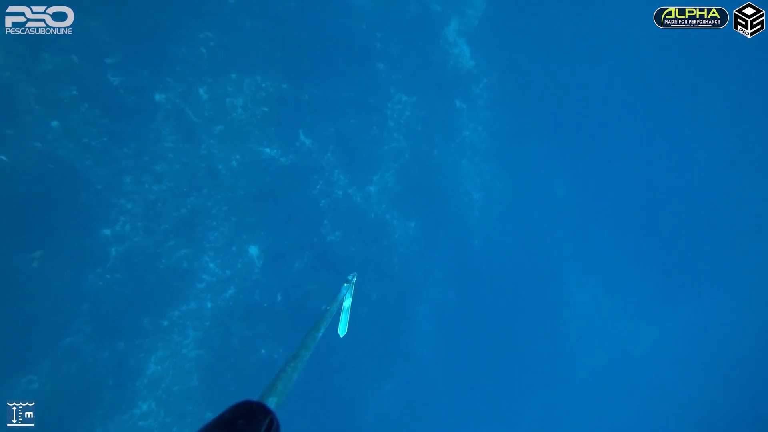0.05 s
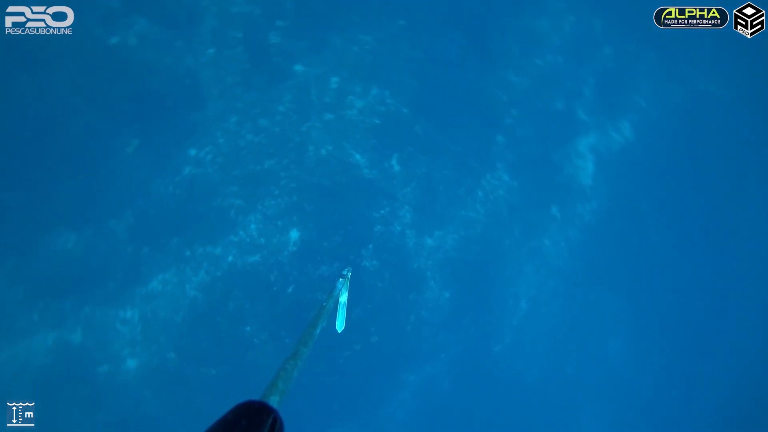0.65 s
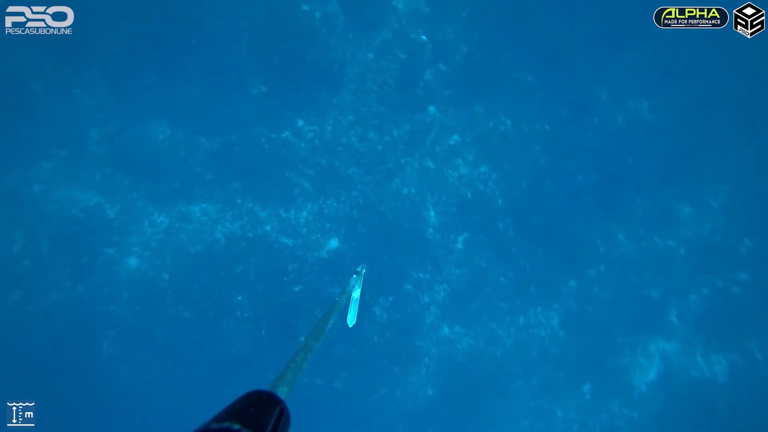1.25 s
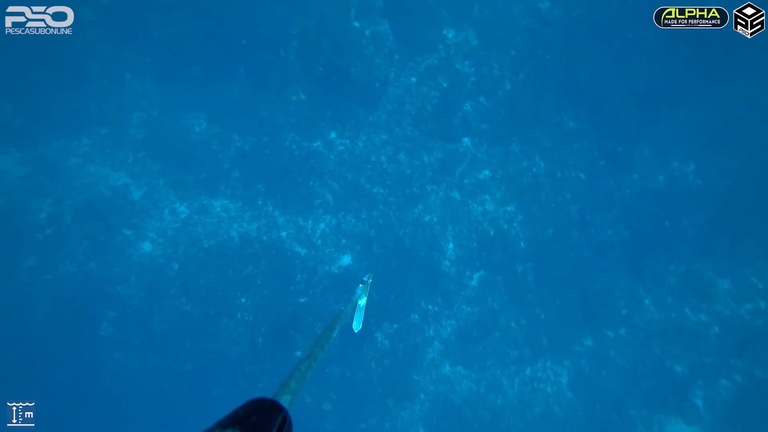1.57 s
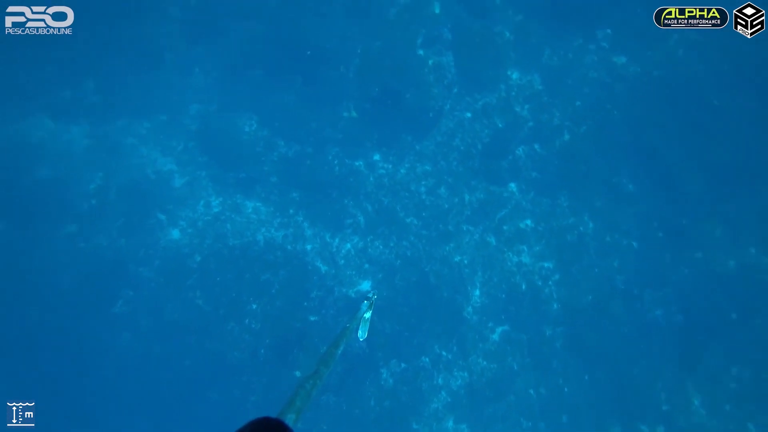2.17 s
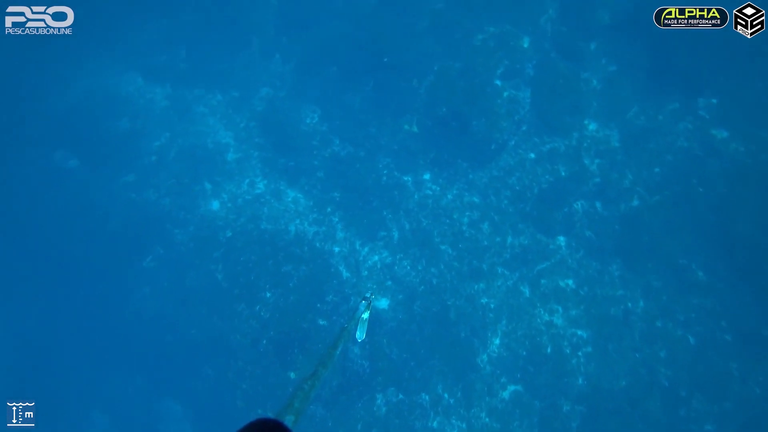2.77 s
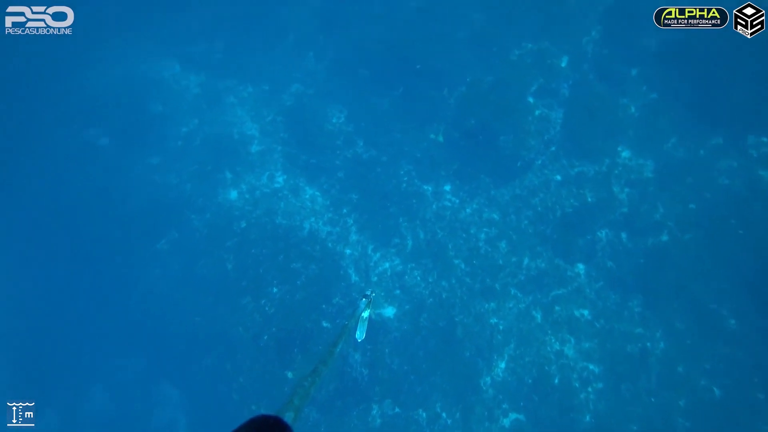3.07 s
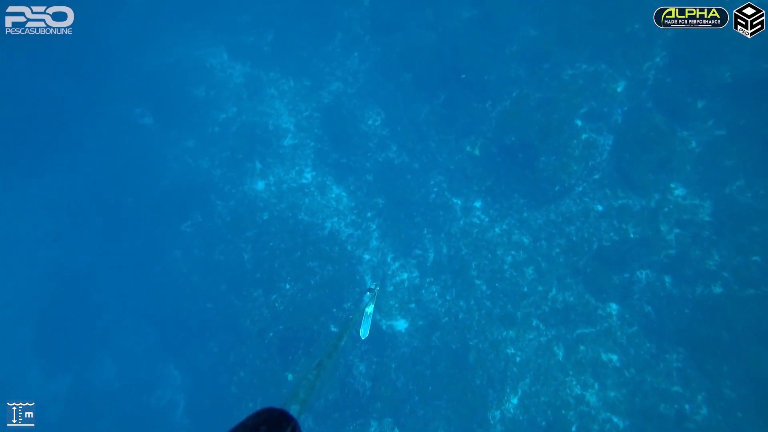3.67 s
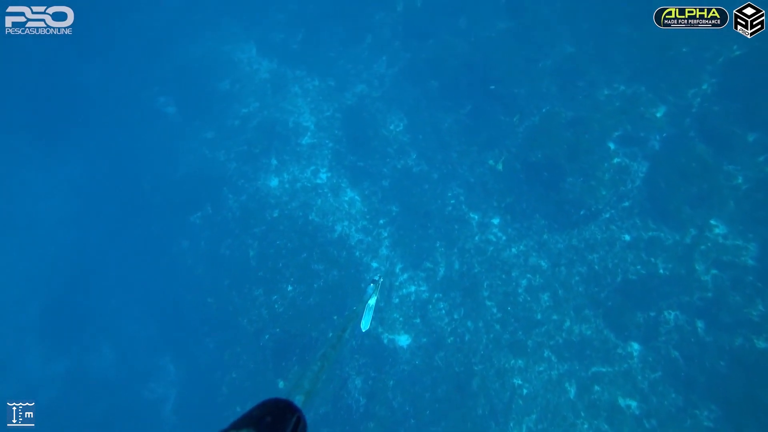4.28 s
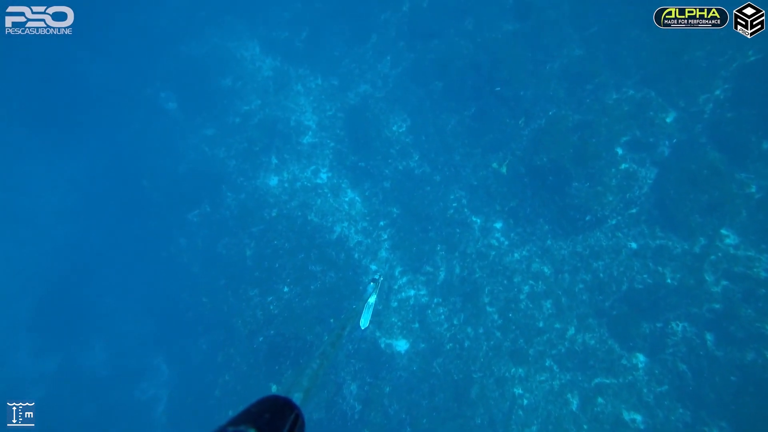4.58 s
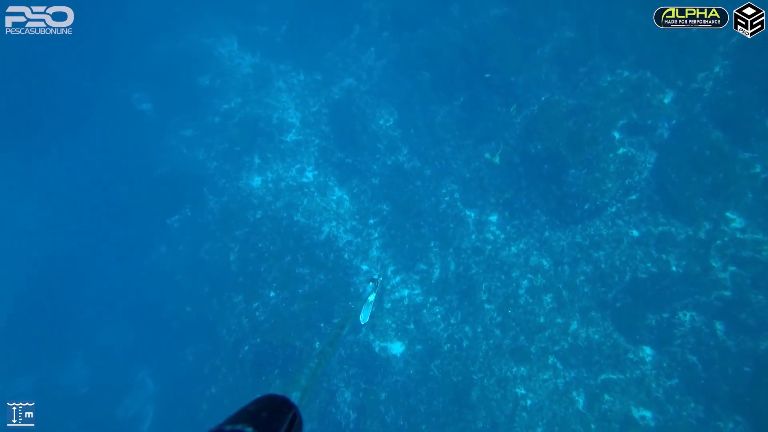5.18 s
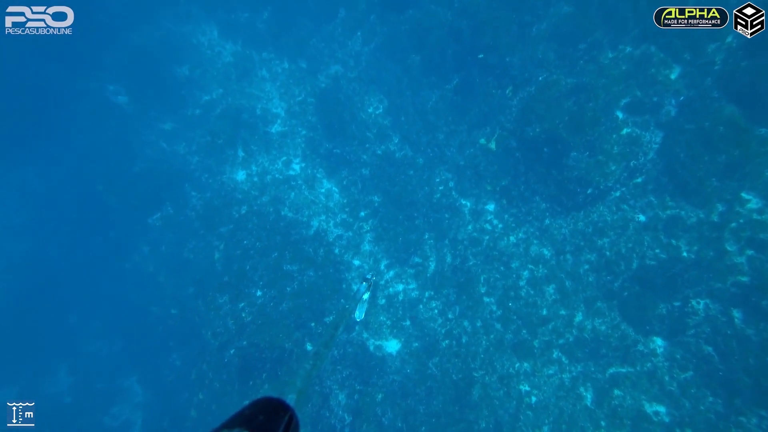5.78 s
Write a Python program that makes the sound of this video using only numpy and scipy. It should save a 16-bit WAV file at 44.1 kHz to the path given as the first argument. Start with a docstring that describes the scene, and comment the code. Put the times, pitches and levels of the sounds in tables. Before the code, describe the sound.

A steady, hollow underwater hiss runs for all six seconds, heard through a waterproof camera housing. Distant snapping shrimp add a fine, dense crackle, while close ones make sharp, bright, irregular clicks with short, grainy echoes. The strongest come at about 2.3, 4.0, 4.8 and 5.1 seconds, with a thinner stretch around three.

Underneath, passing water makes a dark rumble and deep surges, strongest between 0.9 and 1.5 seconds. The diver's gear hums on one low, fluttering note that swells from about 1 to 2.2 seconds, again near 3.9, and from 4.5 to 5.

At about 1.3 seconds the gear gives five quick, soft, hollow knocks. Small bubbles blip near 0.7, 3.9 and 5.3 seconds. Dull, briefly rattling clacks are scattered throughout, clearest near 1.7 and 3.9 seconds and between 4.8 and 5.5.

```python
"""A bright crackle of snapping shrimp over a low, swelling hum and rumble: a diver gliding over a reef.
Each snap is a collapsing cavity that rings the waterproof camera housing and scatters off the rocks.
Passing water rumbles and sets the diver's gear humming, over a steady, hollow wash.
Small bubbles blip, dull clacks rattle, and the gear gives one quick run of knocks."""
import sys
import numpy as np
from scipy import signal
from scipy.fft import rfft, irfft
from scipy.io import wavfile

SR = 44100
rng = np.random.default_rng(int(sys.argv[2]) if len(sys.argv) > 2 else 0)


def pcm_store(signal):
    """Save signal as 16-bit PCM."""
    levels = np.round(np.clip(np.atleast_2d(signal), -1, 1) * 32767)
    wavfile.write(sys.argv[1], SR, levels.astype(np.int16).T)


N = 266364
TIME = np.arange(N) / SR
FREQS = np.fft.rfftfreq(N, 1 / SR)
LEFT_RIGHT = np.array([[1], [-1]])  # opposite signs at the housing's two sound ports

# Table levels are relative: each source adds its own gain.
# Tone of the wash, shared by the ports (mid) and opposed (side). Each row: frequency in Hz, level in dB.
WASH_MID = [(100, 12.5), (300, 3.5), (450, 1), (700, 4.5), (950, 0.5), (1200, 3.5), (1550, -3), (2100, 2),
            (2450, -1), (2800, -5.5), (4200, -10), (6000, -11.5), (11000, -15.5)]
WASH_SIDE = [(60, -2), (200, -2.5), (270, 0.5), (350, -6), (650, -2.5), (900, -4.5), (1200, 1), (1600, -7),
             (2080, -3), (2450, -10), (3000, -14.5), (4200, -19.5), (6000, -25), (11000, -30.5)]
# Resonances the wash keeps ringing. Each row: pitch in Hz, width in Hz, mid in dB, side in dB.
WASH_RINGS = [(2022, 170, -73.5, -66), (2517, 41, -76, -75), (10900, 23, -98, -100)]
# The wash eases as the diver sinks away from the surface. Each row: time in seconds, level in dB.
WASH_LEVEL = [(0.0, 0), (1.3, 1), (3.0, -0.68), (6.04, -0.63)]
# Swells of the surge, the turbulence and the flow-driven hum. Each row: time in seconds, level in dB.
SURGE_LEVEL = [(0.0, -54), (0.57, -62), (0.86, -58), (0.93, -41), (0.99, -71), (1.14, -49.5), (1.46, -45.5),
               (2.56, -56.5), (2.73, -52), (2.84, -57), (2.94, -58), (6.04, -50.5)]
RUMBLE_LEVEL = [(0.0, -69), (0.55, -56.5), (1.0, -56.5), (1.3, -48.5), (1.55, -55), (2.5, -55.5),
                (2.95, -65), (3.25, -55), (3.9, -54.5), (5.4, -57.5), (6.04, -54.5)]
HUM_LEVEL = [(0.0, -56), (0.1, -67), (0.35, -55), (0.99, -59), (1.07, -46), (1.3, -44.5), (1.68, -47.5),
             (1.8, -41.5), (2.2, -45.5), (2.32, -71), (2.44, -51.5), (2.78, -58.5), (2.93, -47.5),
             (3.41, -57.5), (3.92, -41), (4.2, -51), (4.45, -50.5), (4.56, -42), (5.03, -45.5), (5.1, -53),
             (5.82, -49.5), (6.04, -65.5)]
# Tone of the surge, the rumble and the clacks. Each row: frequency in Hz, level in dB.
SURGE_COLOUR = [(12, -6), (22, -4.5), (29, -4.5), (38, -2), (50, -12.5), (80, -33), (200, -91), (600, -65)]
RUMBLE_COLOUR = [(45, -2.5), (90, -5.5), (130, -12.5), (155, -9.5), (200, -22.5), (300, -30), (600, -49.5)]
CLACK_COLOUR = [(300, -37), (900, -9), (1350, -14.5), (1600, -14.5), (1830, 4), (2150, -6.5), (2450, 0),
                (2750, -17.5), (3100, -5), (3800, -10), (4450, -15), (4780, -12.5), (5800, -7.5),
                (7200, -17.5), (11000, -37)]
# Cues for the bubble blips, gear knocks and clacks. Each row: start in seconds, level in dB.
BLIPS = [(0.013, -50), (0.025, -51), (0.729, -40.5), (1.818, -56), (1.873, -56), (2.992, -58), (3.379, -56),
         (3.443, -56), (3.883, -48), (3.891, -40.5), (3.907, -41.5), (4.007, -51), (4.177, -55.5),
         (4.236, -51), (4.273, -56.5), (4.498, -54), (5.021, -49), (5.038, -49), (5.308, -49.5),
         (5.344, -49.5), (5.366, -45.5), (5.606, -53)]
KNOCKS = [(1.281, -37.5), (1.313, -42.5), (1.341, -44), (1.36, -41), (1.396, -38)]
CLACKS = [(0.0623, -52), (0.2134, -45.5), (0.841, -51.5), (1.2525, -44), (1.471, -47.5), (1.7278, -39),
          (1.8561, -43.5), (2.391, -50), (3.1615, -50), (3.5274, -52), (3.9494, -41.5), (4.0593, -50),
          (4.793, -40.5), (4.8753, -45.5), (4.9505, -40), (5.1767, -48), (5.2846, -47.5), (5.369, -42.5),
          (5.4626, -47.5), (5.8915, -45.5)]
# Modes of the knocked gear and of the housing that the snaps ring.
# Each row: pitch in Hz, time to fall 60 dB in seconds, level in dB, phase between the ports in radians.
GEAR_MODES = [(157.7, 0.28, -7.5, 1.7), (175, 0.21, -18, 1.8), (264, 0.24, -6, 2.56),
              (330, 0.0087, 4, 1.64), (560, 0.1, -11, 1.8), (615, 0.041, 0.5, 2.1), (1120, 0.022, -16, 2)]
HOUSING_MODES = [(2200, 0.0093, -17, 1), (3170, 0.0055, -11.5, 1.3), (4460, 0.0039, -17, 3.5),
                 (4890, 0.0037, -7.5, 0), (5450, 0.008, -8, 2.86), (6040, 0.0038, 2, 1.5),
                 (6910, 0.0043, -7.5, 1.13), (8050, 0.0026, -3, 0.86), (8640, 0.0038, -11, 0),
                 (9940, 0.0063, -18.5, -3)]
# How busy the distant colony sounds. Each row: time in seconds, level in dB.
COLONY_LEVEL = [(0.0, -65), (0.23, -59), (0.45, -65), (0.75, -65), (2.05, -63.5), (2.42, -63),
                (2.85, -63.5), (3.4, -62), (4.35, -64), (4.9, -63), (6.04, -64)]
# Close shrimp snaps.
# Each row: start in seconds, level in dB, favoured pitch in Hz, echo tail in dB against the snap.
SNAPS = [(0.0634, -37, 7130, -6), (0.0729, -35, 5880, -11), (0.1326, -39.5, 6050, -12),
         (0.1508, -44, 5880, -8), (0.2514, -36.5, 6060, -4), (0.2675, -32.5, 6200, -8),
         (0.328, -33.5, 6230, -16), (0.5791, -41, 8020, -8), (0.618, -30.5, 5900, -9),
         (0.841, -35.5, 6130, -12), (0.8484, -42, 4170, -6), (0.8672, -38.5, 6060, -4),
         (0.8963, -41, 5940, -4), (1.0939, -35, 5980, -10), (1.2115, -37, 6300, -8),
         (1.293, -37, 6200, -10), (1.3332, -35.5, 6230, 0), (1.4326, -39.5, 6090, -11),
         (1.6426, -32, 6000, -9), (1.6845, -36, 5600, -1), (1.7798, -33.5, 6030, -14),
         (1.8552, -40.5, 6000, -11), (2.0335, -37, 6030, -9), (2.0655, -36.5, 6250, -7),
         (2.3026, -39, 8930, -8), (2.3353, -26.5, 6260, -1), (2.3444, -46, 8150, -12),
         (2.4084, -39, 5800, -8), (2.4643, -42, 5290, -5), (2.9492, -45, 6050, -5), (3.1602, -44, 6060, -3),
         (3.3732, -38.5, 5860, -4), (3.4479, -42.5, 8200, -5), (3.5258, -39, 6300, -10),
         (3.7534, -40.5, 9790, -17), (3.9005, -41, 5440, -8), (4.0464, -23.5, 5900, -11),
         (4.1067, -28.5, 5700, -12.5), (4.118, -33.5, 6030, -5), (4.7686, -43, 5410, -5),
         (4.8207, -29, 6130, -7), (4.8279, -33.5, 5600, -9), (4.8735, -39, 6100, -10),
         (5.0741, -28.5, 6040, -8), (5.178, -32, 6320, -8), (5.372, -35, 6240, -4), (5.3844, -37, 5470, -3),
         (5.4345, -40, 4730, -8), (5.455, -36, 5800, -8), (5.651, -36, 9500, -15),
         (5.6625, -30, 5950, -10.5)]


def undb(db):
    """Decibels to gain."""
    return 10 ** (np.asarray(db) / 20)


def unit(x):
    """Scale to rms 1."""
    return x / np.sqrt(np.mean(x ** 2))


def curve(table):
    """A fader ride: straight lines through (seconds, value) points."""
    return np.interp(TIME, *np.transpose(table))


def noise(gain):
    """Noise of rms 1, shaped by a gain at each frequency."""
    return unit(irfft(rfft(rng.standard_normal(N)) * gain, N))


def colour(points):
    """An EQ curve through (Hz, dB) points, rolling off below the first."""
    hz, db = np.transpose(points)
    return undb(np.interp(np.log(FREQS + 1), np.log(hz), db)) * np.minimum(FREQS / hz[0], 1) ** 2


def wander(rate_hz):
    """Smooth random modulation of rms 1, moving at up to about rate_hz."""
    return noise(1 / (1 + (FREQS / rate_hz) ** 4))


def add(out, start, sound):
    """Mix a sound in at a time in seconds."""
    i = int(np.clip(start * SR, 0, N - 1))
    out[:, i:i + sound.shape[1]] += sound[:, :N - i]


def ring(modes, length_s, scatter_db, rise_s):
    """A struck body: each blow shares its energy differently among modes, heard out of step per port."""
    t = np.arange(int(length_s * SR)) / SR
    out = 0
    for hz, t60, db, lag in modes:
        detuned_hz = hz * (1 + 0.025 * rng.standard_normal())
        phase = 2 * np.pi * (detuned_hz * t + rng.random())
        envelope = undb(db + scatter_db * rng.standard_normal()) * np.exp(-np.log(1000) * t / t60)
        out = out + envelope * np.sin(phase + LEFT_RIGHT * lag / 2)
    return out * (1 - np.exp(-t / rise_s))


def reef_echoes(sound, early_t60=0.058, late_t60=1.0, late_db=-15):
    """Rocks and the surface return a snap as a grainy tail: a quick cluster, then faint stragglers."""
    t = np.arange(SR // 6) / SR
    fade = np.exp(-np.log(1000) * t / early_t60) + undb(late_db) * np.exp(-np.log(1000) * t / late_t60)
    echoes = rng.standard_normal(len(t)) * (rng.random(len(t)) < .06) * fade
    return signal.fftconvolve(sound, echoes[None] / np.linalg.norm(echoes), axes=1)


def wash(mid_db=-62.0, side_db=-56.5, sway_db=1.0):
    """The bed: a wide, steady hiss coloured by the hollow housing, largely opposite at the two ports."""
    mid = noise(colour(WASH_MID)) * undb(mid_db)
    side = noise(colour(WASH_SIDE)) * undb(side_db)
    for hz, width, ring_mid_db, ring_side_db in WASH_RINGS:
        peak = 1 / (1 + (2 * (FREQS - hz) / width) ** 2)
        mid = mid + noise(peak) * undb(ring_mid_db)
        side = side + noise(peak) * undb(ring_side_db)
    return (mid + LEFT_RIGHT * side) * undb(curve(WASH_LEVEL) + sway_db * wander(3.8))


def surge(gain_db=-1, side_db=-12):
    """Water pushes slowly against the housing in sub-bass swells."""
    tone = colour(SURGE_COLOUR)
    pressure = noise(tone) + LEFT_RIGHT * undb(side_db) * noise(tone)
    return pressure * undb(curve(SURGE_LEVEL) + gain_db)


def rumble():
    """Turbulence round the housing makes a dark rumble, dead centre."""
    return noise(colour(RUMBLE_COLOUR)) * undb(curve(RUMBLE_LEVEL))


def gear_hum(gain_db=3.5, pitch_hz=66.53, drift_hz=0.41, flutter=0.067, buffet=0.18, buffet_hz=8):
    """Shed vortices keep the gear humming on one low note that falters as eddies pass."""
    phase = 2 * np.pi * np.cumsum(pitch_hz + drift_hz * wander(1.6)) / SR
    note = (1 + flutter * wander(41)) * np.sin(phase)
    phase_flutter = flutter * wander(10) * np.cos(phase)
    hum = np.sqrt(2) * (note + phase_flutter)
    swing = np.tanh(np.abs(1 + 2 * buffet * wander(buffet_hz)))  # saturates: dips more than it peaks
    return hum * swing * undb(curve(HUM_LEVEL) + gain_db)


def bubbles(gain_db=1, pitch_hz=580.6, spread=0.022, swell_s=0.0052, glide=4, lag_rad=0.88, wobble_db=3):
    """Small bubbles of nearly one size swell, wobble and die within a few cycles, chirping upward."""
    out = np.zeros((2, N))
    t = np.arange(SR // 25) / SR
    envelope = (t / swell_s * np.exp(1 - t / swell_s)) ** 2
    for start, db in BLIPS:
        hz = pitch_hz * (1 + spread * rng.standard_normal())
        phase = 2 * np.pi * (hz * (t + glide * (t - swell_s) ** 2) + rng.random())
        add(out, start, undb(db + gain_db) * envelope * np.sin(phase + LEFT_RIGHT * lag_rad / 2))
    return out * undb(wobble_db * wander(107))


def gear_knocks(gain_db=4.5):
    """The gear shifts in a quick run of soft, hollow knocks."""
    out = np.zeros((2, N))
    for start, db in KNOCKS:
        knock = ring(GEAR_MODES, length_s=.2, scatter_db=3.5, rise_s=0.0012)
        add(out, start, undb(db + gain_db) * knock)
    return out


def clacks(gain_db=-5, side_db=3, grain_db=2, rise_s=0.00027, fade_s=0.0085):
    """Dull clicks that arrive smeared into a rattle of some ten milliseconds."""
    envelope = np.zeros((1, N))
    t = np.arange(SR // 10) / SR
    burst = (1 - np.exp(-t / rise_s)) * np.exp(-t / fade_s)
    for start, db in CLACKS:
        add(envelope, start, undb(db + gain_db) * burst[None])
    grain = undb(grain_db * wander(330))
    tone = colour(CLACK_COLOUR)
    return envelope * grain * (noise(tone) + LEFT_RIGHT * undb(side_db) * noise(tone))


def far_snaps(count=1000, spread_db=4.0, largest_db=13, tail_db=-1):
    """The distant colony: a dense crackle of tiny snaps, half lost in their own echoes."""
    out = np.zeros((2, N))
    for when, size in rng.random((count, 2)):
        start = when * N / SR
        db = min(-spread_db * np.log(1 - size), largest_db)  # many faint, a few loud
        snap = undb(db) * ring(HOUSING_MODES, length_s=.01, scatter_db=5, rise_s=0.000093)
        add(out, start, snap)
        add(out, start, undb(tail_db) * reef_echoes(snap))
    return unit(out) * undb(curve(COLONY_LEVEL))


def near_snaps(gain_db=2, pan_spread_db=4, focus_hz=3800, crack_db=-13, crack_fade_s=0.00065):
    """Close shrimp: each collapsing cavity cracks and pings the housing, most near its own pitch."""
    out = np.zeros((2, N))
    for start, db, centre_hz, tail_db in SNAPS:
        pan_db = pan_spread_db * rng.standard_normal()
        modes = [(hz, t60, mode_db - min(10 * ((hz - centre_hz) / focus_hz) ** 2, 8), lag)
                 for hz, t60, mode_db, lag in HOUSING_MODES]
        ping = ring(modes, length_s=.015, scatter_db=3.5, rise_s=0.00076)
        t = np.arange(ping.shape[1]) / SR
        crack = undb(crack_db) * rng.standard_normal(len(t)) * np.exp(-t / crack_fade_s)
        snap = (ping / np.abs(ping).max() + crack) * undb(db + gain_db + LEFT_RIGHT * pan_db / 2)
        add(out, start, snap)
        add(out, start, undb(tail_db) * reef_echoes(snap))
    return out


def scene():
    """The full mix at the housing: moving water below, shrimp and small details on top."""
    flow = gear_hum() + rumble() + surge()
    return flow + wash() + near_snaps() + far_snaps() + clacks() + bubbles() + gear_knocks()


def record(dry):
    """A steep low-pass removes the treble above 11.1 kHz."""
    return signal.sosfilt(signal.ellip(10, .2, 70, 11100, fs=SR, output="sos"), dry)


dry = scene()
out = record(dry)
pcm_store(out)
```